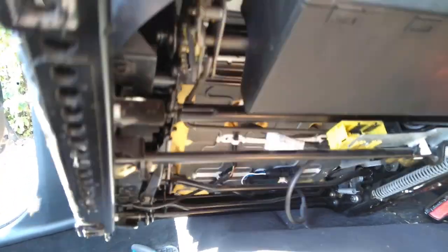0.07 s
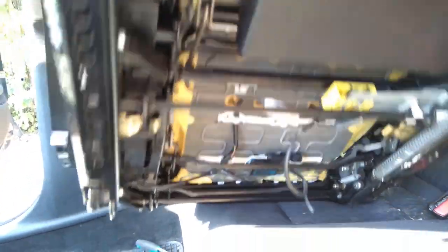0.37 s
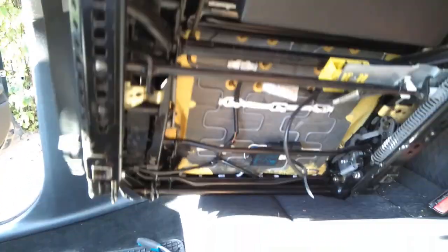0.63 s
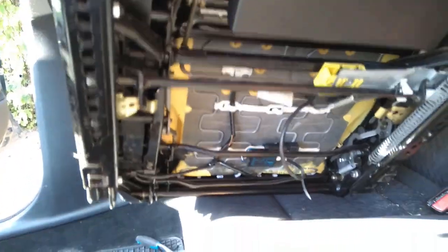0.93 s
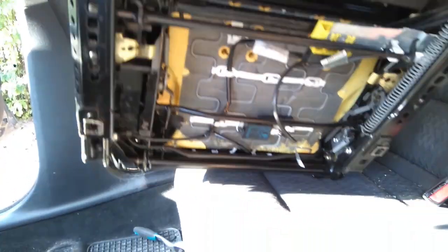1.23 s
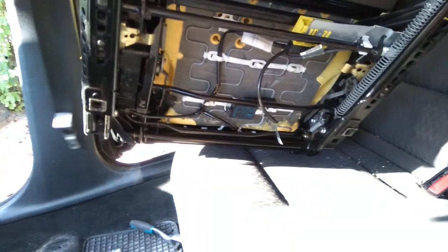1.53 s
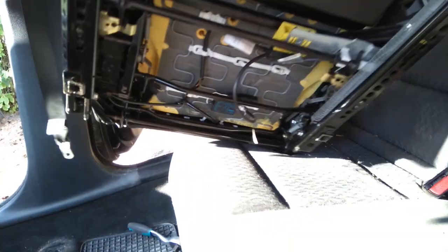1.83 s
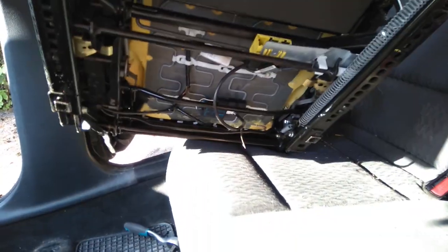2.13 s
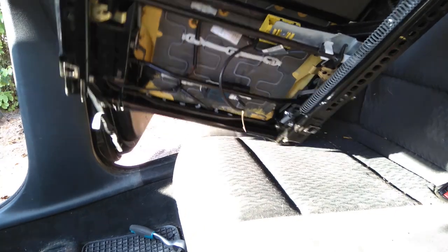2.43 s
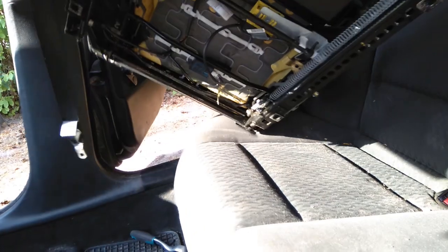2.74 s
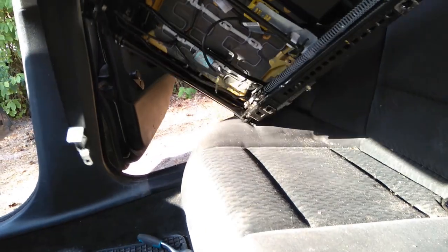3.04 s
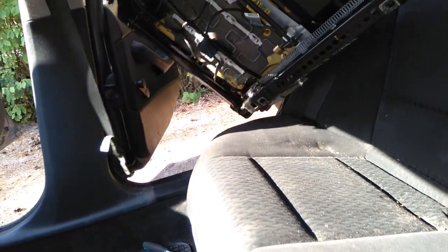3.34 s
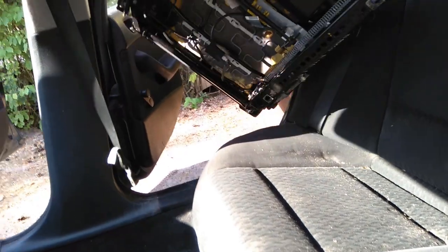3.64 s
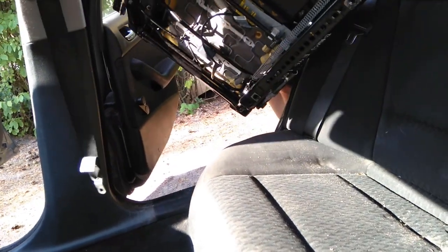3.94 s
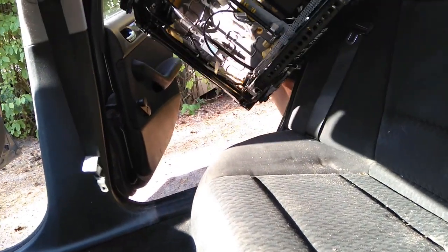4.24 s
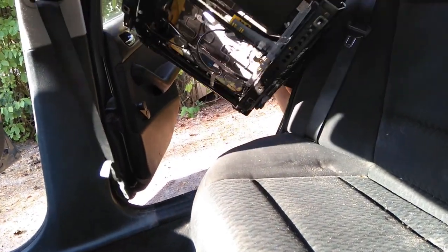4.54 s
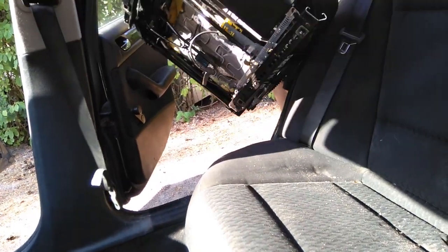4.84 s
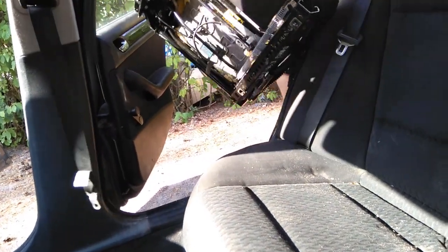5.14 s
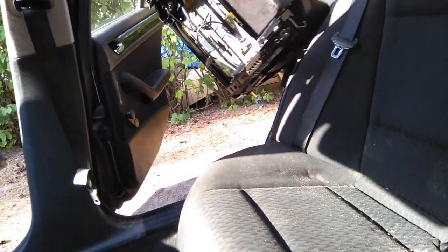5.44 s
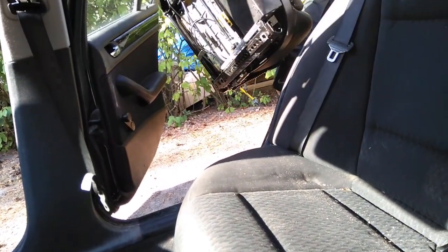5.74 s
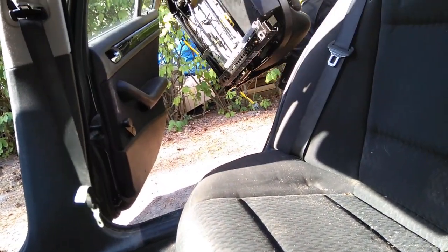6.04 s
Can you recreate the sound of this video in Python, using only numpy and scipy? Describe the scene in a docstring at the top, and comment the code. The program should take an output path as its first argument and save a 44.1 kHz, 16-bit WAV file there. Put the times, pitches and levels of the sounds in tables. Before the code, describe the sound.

Cloth scuffs and hisses close to the microphone inside an acoustically dead car cabin as a loose seat is pulled out. A loud burst of metal knocks and plastic clicks comes first, followed by cushion creaks, light taps and a faint groan. An edge rasps over trim, the rubber door seal squeaks, and the frame knocks again. A faint zip of webbing, a brief clicking rattle and several scrapes finish the move.

```python
"""A car seat slides out through an open door, its upholstery rustling and scraping by sliding friction.
Impacts excite damped modes: the loose plastic plug and wires tap on the steel frame, and the frame
knocks on the trim. Stick-slip motion makes the cushion creak and groan and the rubber door seal squeak.
The body shell booms under the rubbing, and ribbed webbing zips past near the end.
The padded cabin is nearly dead, and the sound is heard from close by."""
import sys
import numpy as np
from scipy import signal
from scipy.fft import rfft, irfft, next_fast_len
from scipy.io import wavfile
from scipy.ndimage import uniform_filter1d

SR = 44100
rng = np.random.default_rng(int(sys.argv[2]) if len(sys.argv) > 2 else 0)


def dump_mix(stems):
    """Bounce the given channels to the path in sys.argv[1] as a 16-bit WAV at rate SR."""
    frames = np.atleast_2d(stems).T  # one column per channel
    limited = np.clip(frames, -1, 1)  # hard clip at full scale
    pcm = np.round(limited * 32767).astype(np.int16)
    wavfile.write(sys.argv[1], SR, pcm)


N = 268833
TIME = np.arange(N) / SR
AGE = np.arange(SR // 4) / SR   # time since a contact
STRIKE_S, CREAK_LEAD_S = .015, .12


def from_db(db):
    """Amplitude ratio of a level."""
    return 10 ** (np.asarray(db) / 20)


def rms_one(x):
    """Normalisation to unit rms."""
    return x / np.sqrt(np.mean(x ** 2) + 1e-20)


def at_hz(spectrum, hz):
    """Level of a spectrum, interpolated in log frequency."""
    f, db = np.transpose(spectrum)
    return np.interp(np.log(np.maximum(hz, 1)), np.log(f), db, left=-70, right=-70)


def add(track, s, sound):
    """Superposition of a sound on the track at time s."""
    start = max(round(s * SR), 0)
    track[start:start + len(sound)] += sound[:max(N - start, 0)]


def white():
    """White noise for one contact."""
    return rng.standard_normal(len(AGE))


def coloured(x, spectrum):
    """Spectral shaping of a noise; rms 1."""
    size = next_fast_len(len(x))
    hz = np.arange(size // 2 + 1) * SR / size
    shaped = rfft(x, size) * from_db(at_hz(spectrum, hz))
    return rms_one(irfft(shaped, size)[:len(x)])


def band(x, low_hz, high_hz):
    """Butterworth band-pass filter."""
    edges = [low_hz, np.clip(high_hz, low_hz + 10, .45 * SR)]
    return signal.sosfilt(signal.butter(3, edges, "band", fs=SR, output="sos"), x)


def drift(rate_hz):
    """Slow random fluctuation: low-passed noise of rms 1."""
    step = 40   # samples
    r = np.exp(-2 * np.pi * step * rate_hz / SR)
    slow = signal.lfilter([1], [1, -2 * r, r * r], rng.standard_normal(N // step + 2002))[2000:]
    return np.interp(np.arange(N) / step, np.arange(len(slow)), rms_one(slow))


def resonate(x, modes):
    """Modal response: damped resonators in parallel, with alternating signs."""
    out = 0
    for k, (hz, width, db) in enumerate(modes):
        r = np.exp(-np.pi * width / SR)
        peak = signal.lfilter([1, 0, -1], [1, -2 * r * np.cos(2 * np.pi * hz / SR), r * r], x)
        out = out + (-1) ** k * from_db(db) * (1 - r * r) / 2 * peak
    return out


def swell(peak_s, length_s):
    """Gaussian envelope, about 9 dB down at either end of its length."""
    return np.exp(-(2 * (TIME - peak_s) / length_s) ** 2)


def held(start_s, end_s, attack_s, release_s):
    """Trapezoidal envelope."""
    return np.clip(np.minimum((TIME - start_s) / attack_s, (end_s - TIME) / release_s), 0, 1)


def dying(rise_s, t60, tail_db, tail_t60):
    """Exponential decay of a contact, with a faint reverberant tail."""
    rise = (1 - np.exp(-AGE / rise_s)) ** 2
    return rise * (from_db(-60 * AGE / t60) + from_db(tail_db - 60 * AGE / tail_t60))


def struck(x, db):
    """An impact scaled to an rms level over its first STRIKE_S."""
    return from_db(db) * x / np.sqrt(np.mean(x[:round(STRIKE_S * SR)] ** 2))


def friction(spectrum, flutter_db, flutter_hz, grains_per_s=700, grain_db=-7.5):
    """Friction noise: countless tiny slips and some coarser grains, modulated by uneven pressure."""
    grains = rng.standard_normal(N) * (rng.random(N) < grains_per_s / SR)
    slips = rng.standard_normal(N) + from_db(grain_db) * rms_one(grains)
    return coloured(slips * from_db(flutter_db * drift(flutter_hz)), spectrum)


def creak(length_s, hz, octaves_per_s, jitter=.046, shimmer_db=1, overtone_db=-9):
    """Brief stick-slip oscillation: a rough, gliding tone that peaks at CREAK_LEAD_S."""
    t = AGE - CREAK_LEAD_S
    waver, shimmer = (rms_one(uniform_filter1d(white(), size=260)) for _ in range(2))
    pitch = hz * 2 ** (octaves_per_s * t) * (1 + jitter * waver)
    phase = 2 * np.pi * np.cumsum(pitch) / SR
    tone = np.sin(phase) + from_db(overtone_db) * np.sin(2 * phase)
    return tone * from_db(shimmer_db * shimmer) * np.exp(-(2 * t / length_s) ** 2)


def catches(speed, per_s=65, rest_hz=274.3, length_s=.016, spread_db=10):
    """Random stick-slip events whose frequency rises with sliding speed; rms 1."""
    out = np.zeros(N)
    for when, scatter, size in rng.random((round(per_s * N / SR), 3)):
        octaves = .6 * speed[int(when * N)] + (scatter - .5)
        catch = creak(length_s, rest_hz * 2 ** octaves, octaves_per_s=0)
        add(out, when * N / SR - CREAK_LEAD_S, from_db(spread_db * size) * catch)
    return rms_one(out)


# Modes of the slide rail: f/Hz, bandwidth/Hz, gain/dB
SLIDE_RAIL_MODES = [(1850, 96, 2), (3020, 97, 13), (3146, 23, 9), (7150, 50, 14.5), (12240, 37, 5.5)]

def on_rail(x, ring_db=-7):
    """Sympathetic resonance: a contact sound plus the thin ring it excites in the rail; rms 1."""
    return rms_one(x + from_db(ring_db) * resonate(x, SLIDE_RAIL_MODES))


# Friction spectra of the cushion, its cover and the weave: f/Hz, relative level/dB
RUB_SPECTRUM = [(25, -35), (60, -36), (105, -17), (150, -5), (210, 2.5), (450, 0.5), (620, -1.5),
                (850, -33), (1300, -9.5)]
SCUFF_SPECTRUM = [(450, -4.5), (750, 2.5), (2000, 2), (4000, -10.5), (5500, -31)]
HISS_SPECTRUM = [(2800, -6), (4200, -1), (7500, -1), (11800, 1), (13500, -3), (16000, -10)]
# Swells of rubbing and cloth noise, from pulls on the seat and as a wash around the two loud clatters:
# peak t/s, duration/s, cloth level/dB, rub level/dB
NOISE_SWELLS = [(0.044, 0.18, -53.5, -53.5), (0.45, 0.14, -48, -58.5), (0.57, 0.23, -56, -47.5),
                (0.785, 0.23, -44.5, -38.5), (1.016, 0.087, -51, -49.5), (1.434, 0.3, -43.5, -40),
                (1.79, 0.28, -47, -41), (2.528, 0.54, -48.5, -47), (3.31, 0.907, -52, -68),
                (4.165, 0.12, -50.5, -41), (4.552, 0.5, -53, -65), (5.254, 0.78, -50, -58.5),
                (5.925, 0.83, -52, -68)]

def upholstery():
    """Sliding friction: foam muffles the rub, the cover scuffs and hisses, and swells add in power."""
    leaning = held(.54, 4.62, attack_s=.67, release_s=.67)
    slides = [(1, -58, -58.5), (leaning, -55, -56)]   # shifting in the hands; against the door opening
    slides += [(swell(s, length), cloth, rub) for s, length, cloth, rub in NOISE_SWELLS]
    cloth_db = 10 * np.log10(sum((shape * from_db(db)) ** 2 for shape, db, _ in slides))
    rub_db = 10 * np.log10(sum((shape * from_db(db)) ** 2 for shape, _, db in slides))
    speed = np.clip((cloth_db + 55) / 10, 0, 1.5)
    rub = from_db(-2.5) * friction(RUB_SPECTRUM, flutter_db=2, flutter_hz=22)
    rub += from_db(-5) * catches(speed)
    scuff = friction(SCUFF_SPECTRUM, flutter_db=2, flutter_hz=12.7)
    hiss = on_rail(friction(HISS_SPECTRUM, flutter_db=1.34, flutter_hz=9.3), ring_db=-8)
    sheen = rms_one(band(rng.standard_normal(N), low_hz=7700, high_hz=13800))
    hiss += from_db(-1.5) * speed * sheen   # faster sliding is brighter
    return from_db(rub_db) * rub + from_db(cloth_db - 2.3) * scuff + from_db(cloth_db - 2.5) * hiss


# Spectrum of a hard contact: f/Hz, relative level/dB
CRACK_SPECTRUM = [(2500, -12.5), (5400, -2.5), (7300, -1), (8600, -2), (11500, 3.5), (16000, -10)]
# Modes of the plastic plug: f/Hz, bandwidth/Hz, gain/dB
PLASTIC_MODES = [(956, 660, 4), (1510, 51, 10), (1670, 160, 5), (1977, 214, 7.5), (2460, 190, 2)]
# Light taps and clicks, and the bright snap on top of some frame knocks: t/s, body level/dB, snap level/dB
LIGHT_TAPS = [(0.0642, -46.5, -54), (0.107, -54.5, -54.5), (1.031, -45.5, -60), (0.674, -41.5, -40),
              (0.7056, -54, -38.5), (0.8012, -32, -25.5), (0.8171, -36, -36), (1.109, -47.5, -72),
              (1.197, -44, -48), (1.328, -47.5, -51), (1.503, -44.5, -54), (1.544, -47, -42.5),
              (1.571, -44, -52), (1.616, -45.5, -65), (1.669, -49, -54), (2.156, -48, -57),
              (2.197, -48, -72), (2.263, -45, -70), (3.311, -44, -49.5), (3.365, -48, -66),
              (3.733, -44.5, -40.5), (3.889, -45, -51.5), (4.066, -50.5, -49), (4.157, -38, -62),
              (5.066, -36, -41), (5.1124, -40, -49.5), (5.1455, -33, -44.5), (5.303, -50, -43.5)]

def taps():
    """Light impacts excite heavily damped modes: a short hollow body under a bright snap."""
    out = np.zeros(N)
    chatter = dying(rise_s=.0012, t60=.032, tail_db=-24, tail_t60=.17)
    for s, body_db, snap_db in LIGHT_TAPS:
        body = band(resonate(white() * chatter, PLASTIC_MODES), low_hz=610, high_hz=3970)
        snap = on_rail(coloured(white(), CRACK_SPECTRUM) * chatter)
        add(out, s, struck(body, body_db) + struck(snap, snap_db))
    return out


# Modes of the cabin, trim panel and steel frame: f/Hz, bandwidth/Hz, gain/dB
THUD_MODES = [(153, 200, -18.5), (237.7, 28, 5.5), (304, 30, 4.5)]
PANEL_MODES = [(430, 95, 1.5), (656, 30, 2)]
STEEL_MODES = [(940, 55, 1), (1075, 80, 1), (1375, 110, 4), (1655, 50, 6), (2030, 80, 3), (2430, 100, 1.5),
               (2825, 70, 3), (3125, 80, 1), (3580, 110, 4)]
# Blows and bounces of frame on trim:
# t/s, panel f/Hz, thud level/dB, panel level/dB, frame level/dB, upper excitation f/Hz
FRAME_KNOCKS = [(0.46, 320, -35, -34.5, -64, 2000), (0.706, 456, -50, -36.5, -48, 2980),
                (0.7526, 432, -39.5, -24, -18.5, 4160), (.762, 433, -35, -31, -31, 2300),
                (0.8017, 610, -32, -18.5, -24, 2580), (0.820, 510, -40, -28, -37, 3220),
                (.848, 500, -40.5, -33, -35, 1990), (1.795, 465, -30.5, -32.5, -39.5, 1940),
                (2.8451, 440, -45, -36, -34.5, 1560), (4.1289, 407, -38, -35, -25, 1530),
                (4.140, 423, -36.5, -36.5, -32, 1260), (4.163, 376, -39, -43, -33, 1400),
                (4.198, 398, -45, -43, -37, 1380), (5.146, 349, -60, -56, -35, 1060)]

def knocks(detune=.01, above_panel=2.14, crack_db_per_db=1.52):
    """Impact excitation of cabin, panel and frame modes; the contact crack grows faster than the blow."""
    out = np.zeros(N)
    push = dying(rise_s=.0003, t60=.016, tail_db=-25, tail_t60=.15)
    chatter = dying(rise_s=.0006, t60=.035, tail_db=-25, tail_t60=.11)
    snap = dying(rise_s=.002, t60=.028, tail_db=-26, tail_t60=.12)
    impulse = np.linalg.norm(push) * (AGE == 0)
    for s, panel_hz, thud_db, panel_db, frame_db, top_hz in FRAME_KNOCKS:
        thud = band(resonate(impulse + white() * push, THUD_MODES), low_hz=128, high_hz=395)
        panel_modes = [(panel_hz, 90, 7)] + PANEL_MODES
        panel = band(resonate(impulse + white() * push, panel_modes), low_hz=260, high_hz=720)
        # the grip shifts the steel's modes; place and padding of the blow choose among them
        modes = [(hz * (1 + detune * rng.standard_normal()), width, db) for hz, width, db in STEEL_MODES]
        contact = white() * chatter
        drive = band(contact, above_panel * panel_hz, top_hz)
        clack = band(contact, low_hz=605, high_hz=2480)
        frame = resonate(drive, modes) + from_db(-4.5) * drive + from_db(-17) * clack
        crack = on_rail(coloured(white(), CRACK_SPECTRUM) * snap)
        crack_db = -43 + crack_db_per_db * (frame_db + 33)   # -33 dB is a middling blow
        for part, db in (thud, thud_db), (panel, panel_db), (frame, frame_db), (crack, crack_db):
            add(out, s, struck(part, db))
    return out


# Friction spectrum of an edge on trim: f/Hz, relative level/dB
RASP_SPECTRUM = [(120, -33), (330, -4.5), (950, 2.5), (2300, 4), (4200, -10), (6000, -12)]
# Drags over the trim: start t/s, end t/s, rasp level/dB, hiss level/dB
EDGE_DRAGS = [(0.553, 0.658, -42, -50.5), (0.738, 0.758, -34, -39), (0.772, 0.854, -35, -44),
              (3.045, 3.162, -45.5, -43.5), (3.194, 3.285, -32, -39), (4.079, 4.142, -45.5, -52.5),
              (4.45, 4.52, -50, -57), (5.426, 5.509, -40.5, -42.5), (5.55, 5.601, -41.5, -46.5),
              (5.715, 5.964, -40.5, -58)]

def scrapes(attack_share=.45, release_share=.29):
    """Friction noise swells as an edge digs in and stops as it slips free; the rail resonates with it."""
    rasp = on_rail(friction(RASP_SPECTRUM, flutter_db=2.2, flutter_hz=63))
    hiss = friction(HISS_SPECTRUM, flutter_db=3, flutter_hz=60)
    hiss = on_rail(band(hiss, low_hz=2000, high_hz=13000))
    out = np.zeros(N)
    for start, end, rasp_db, hiss_db in EDGE_DRAGS:
        length = end - start
        stroke = held(start, end, attack_share * length, release_share * length)
        out += stroke * (from_db(rasp_db) * rasp + from_db(hiss_db) * hiss)
    return out


# Cushion catching on trim: peak t/s, duration/s, f/Hz, glide/(octaves per s), level/dB
CUSHION_CREAKS = [(1.44, 0.081, 380, -3.5, -42), (1.757, 0.03, 482, 3.5, -40), (1.875, 0.03, 405, 0, -39),
                  (2.005, 0.051, 422.5, 11.5, -44.5), (4.059, 0.017, 346, -13, -38),
                  (4.463, 0.02, 1034, 8, -46.5), (4.823, 0.03, 952, 8, -47.5)]

def creaks():
    """Single stick-slip bursts of the cushion stand out from its rub."""
    out = np.zeros(N)
    for s, length, hz, octaves_per_s, db in CUSHION_CREAKS:
        add(out, s - CREAK_LEAD_S, from_db(db) * creak(length, hz, octaves_per_s))
    return out


# Cushion pressing on the body shell: peak t/s, duration/s, level/dB
SHELL_PRESSES = [(1.578, 0.11, -40), (1.77, 0.067, -43), (2.04, 0.042, -49), (3.452, 0.06, -49)]

def boom():
    """Forced vibration: rubbing drives the lowest resonance of the cabin."""
    pressure = sum(from_db(db) * swell(s, length) for s, length, db in SHELL_PRESSES)
    return pressure * rms_one(band(rng.standard_normal(N), low_hz=144, high_hz=242))


def glide(curve):
    """Frequency and gain interpolated along a curve, silent outside it."""
    s, hz, db = np.transpose(curve)
    sounding = (TIME > s[0]) * (TIME < s[-1])
    return np.interp(TIME, s, hz), sounding * from_db(np.interp(TIME, s, db))


def stick_slip(hz, gain, jitter, shimmer_db):
    """Relaxation oscillation: phase and amplitude of a nearly periodic grip and release."""
    pitch = hz * (1 + jitter * drift(rate_hz=80.4))
    return 2 * np.pi * np.cumsum(pitch) / SR, gain * from_db(shimmer_db * drift(rate_hz=26))


# Groan of the dragged cushion: t/s, f/Hz, level/dB
GROAN_CURVE = [(2.87, 150, -55), (2.94, 185.8, -53), (3.04, 133, -58), (3.11, 110, -69)]

def groan():
    """Damped stick-slip: the soft cushion leaves little more than the fundamental."""
    phase, amplitude = stick_slip(*glide(GROAN_CURVE), jitter=.0098, shimmer_db=2)
    return amplitude * (np.sin(phase) + from_db(-7) * np.sin(2 * phase))


# Resonant response that colours the squeak: f/Hz, gain/dB
SEAL_RESPONSE = [(450, -11.5), (610, 5), (720, -17), (1120, 5.5), (1350, -11), (1700, -1), (3000, -8)]

def squeak(start_s=3.57, judder_s=3.765, end_s=3.945, judder_per_s=18.3, depth_hz=27):
    """Stick-slip on the rubber seal: the pitch sags as the slide slows, then wobbles as it judders."""
    since = TIME - judder_s
    sag_hz = 500 - 1080 * since
    judder_hz = 546 - 168 * since + depth_hz * np.sin(2 * np.pi * judder_per_s * since)
    hz = np.where(since < 0, sag_hz, judder_hz)
    gain = from_db(-47) * held(start_s, end_s, attack_s=.033, release_s=.022)
    phase, amplitude = stick_slip(hz, gain, jitter=.013, shimmer_db=1.5)
    instant_hz = np.diff(phase, prepend=0) * SR / (2 * np.pi)
    roughness = 1 + .27 * drift(rate_hz=150)
    tone = sum(from_db(at_hz(SEAL_RESPONSE, k * instant_hz) + db) * np.sin(k * phase)
               for k, db in [(1, 0), (2, 0), (3, 0), (4, -5.3)])
    return amplitude * roughness * tone


# A slowing zip over ribbed webbing: t/s, f/Hz, level/dB
ZIP_CURVE = [(4.545, 6550, -57), (4.567, 5270, -50), (4.595, 3780, -51)]

def webbing():
    """Uneven ribs modulate a tone at their passing frequency into a narrow, falling hiss."""
    phase, amplitude = stick_slip(*glide(ZIP_CURVE), jitter=.013, shimmer_db=-6)
    unevenness = rms_one(band(rng.standard_normal(N), low_hz=24, high_hz=500))
    return amplitude * np.sin(phase) * unevenness


def scene():
    """Superposition of all sources, the same in both channels."""
    impacts = knocks() + taps()
    rubbing = scrapes() + upholstery() + creaks() + boom() + webbing() + squeak() + groan()
    return np.array([impacts + rubbing] * 2)


def record(dry, cutoff_hz=16200):
    """An elliptic low-pass filter cuts the highest treble steeply."""
    return signal.sosfilt(signal.ellip(10, .2, 80, cutoff_hz, fs=SR, output="sos"), dry)


dry = scene()
out = record(dry)
dump_mix(out)
```